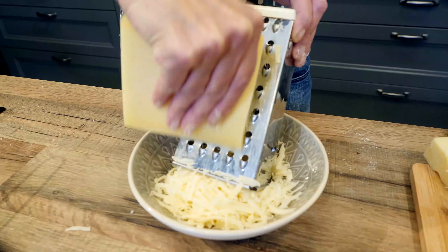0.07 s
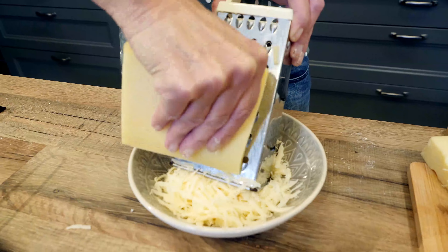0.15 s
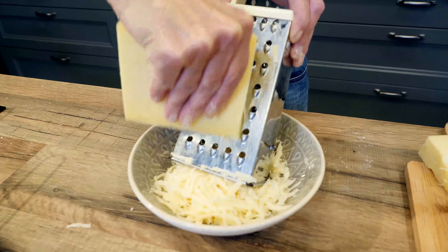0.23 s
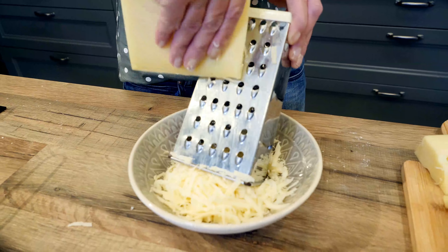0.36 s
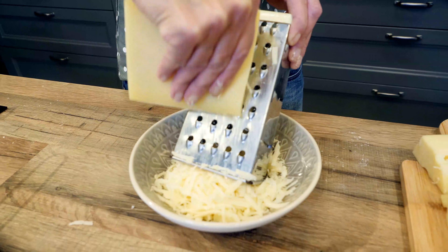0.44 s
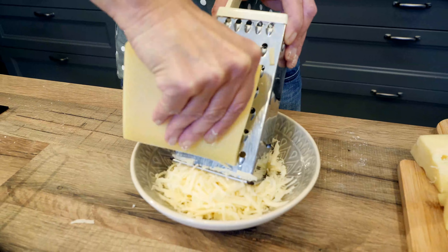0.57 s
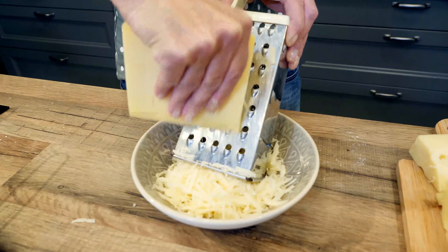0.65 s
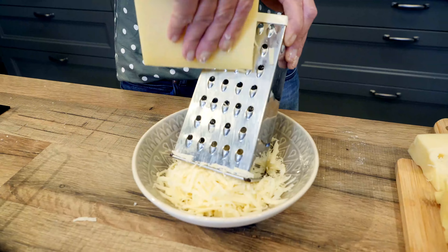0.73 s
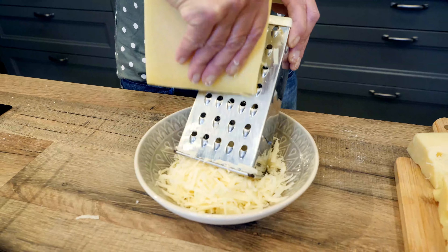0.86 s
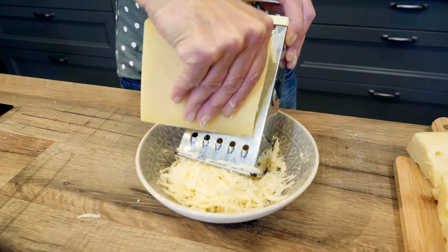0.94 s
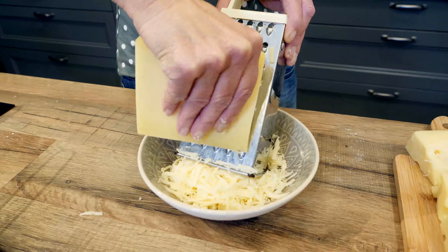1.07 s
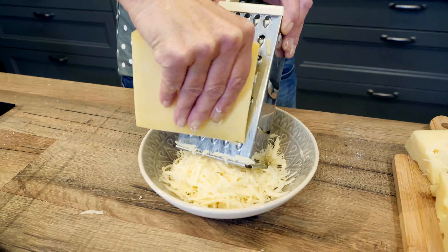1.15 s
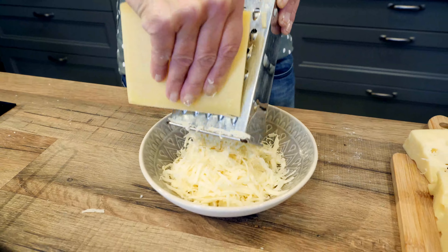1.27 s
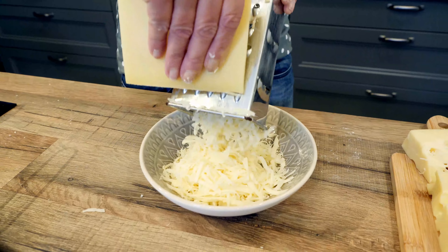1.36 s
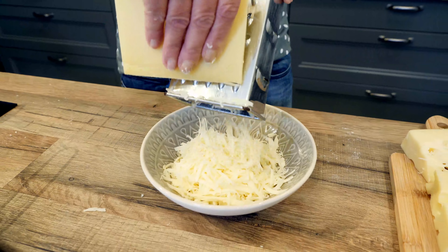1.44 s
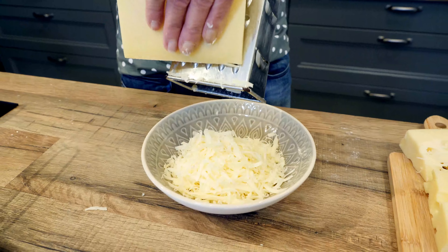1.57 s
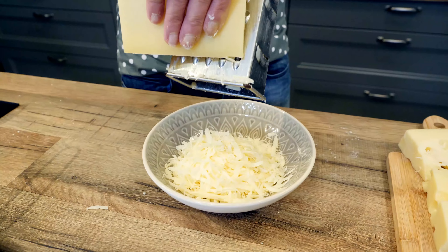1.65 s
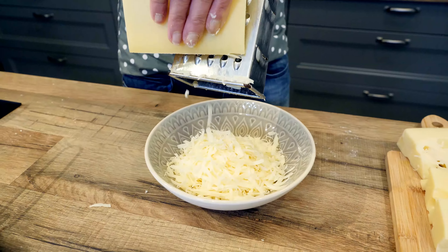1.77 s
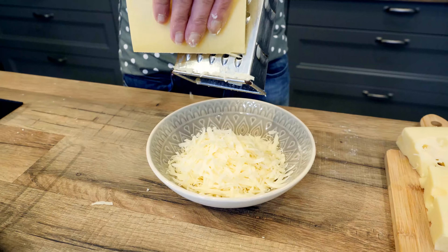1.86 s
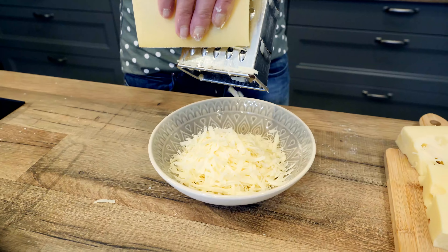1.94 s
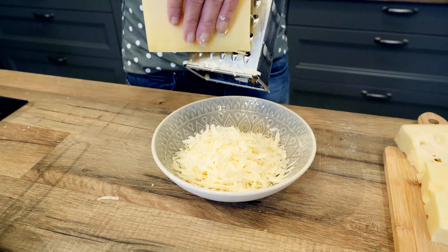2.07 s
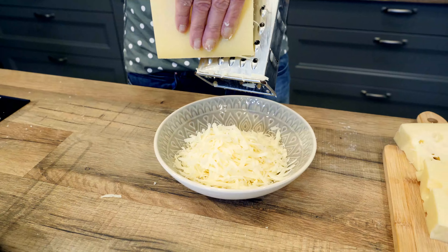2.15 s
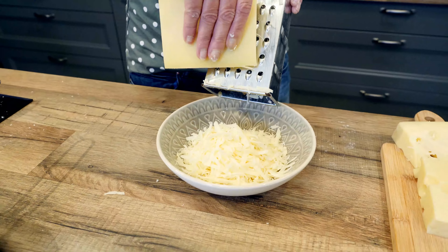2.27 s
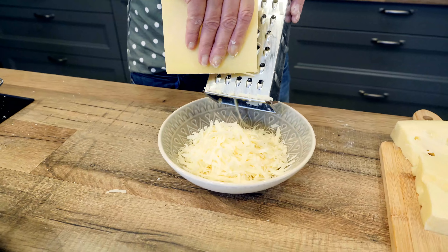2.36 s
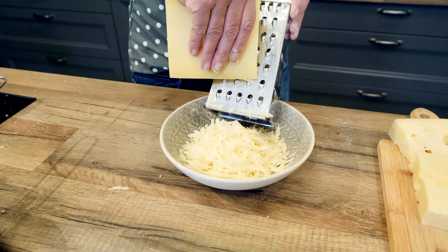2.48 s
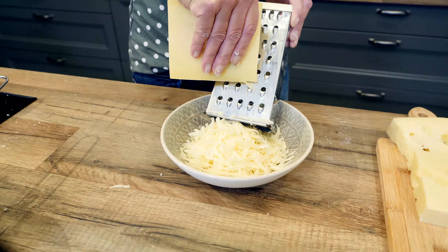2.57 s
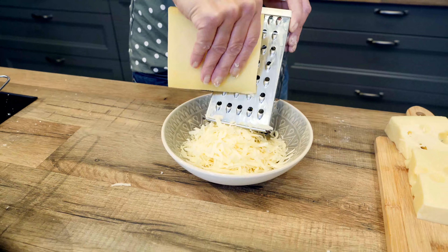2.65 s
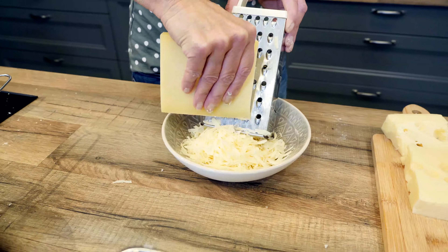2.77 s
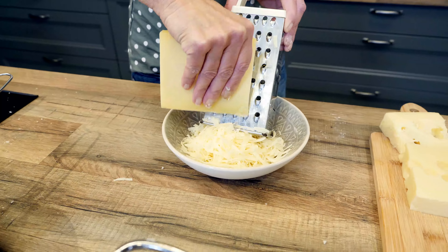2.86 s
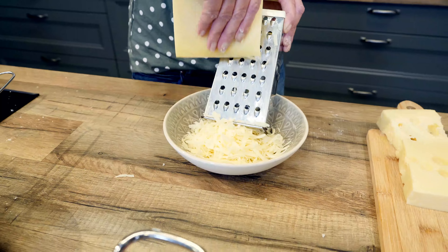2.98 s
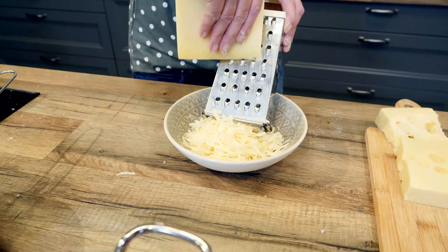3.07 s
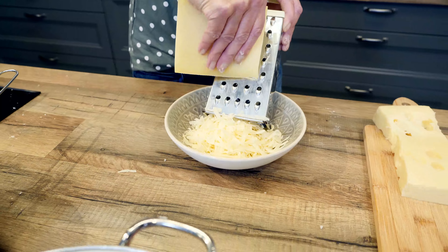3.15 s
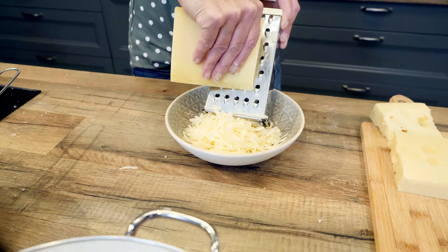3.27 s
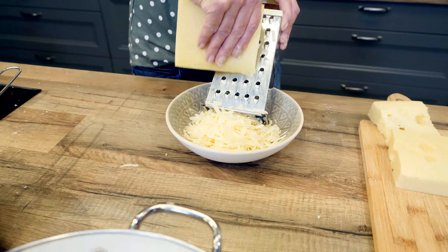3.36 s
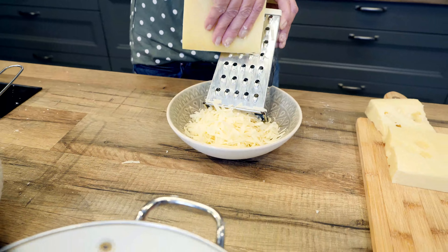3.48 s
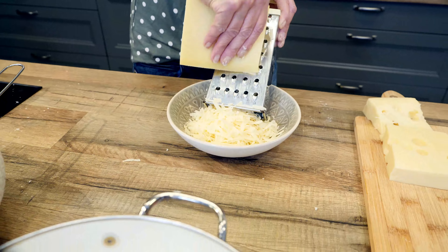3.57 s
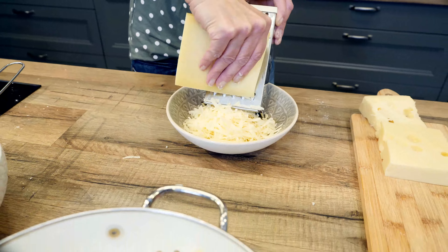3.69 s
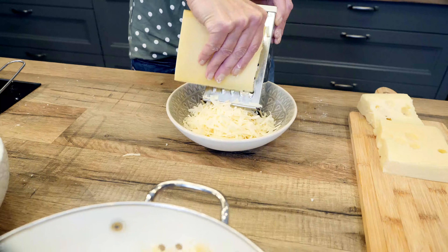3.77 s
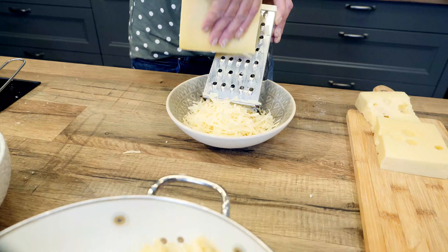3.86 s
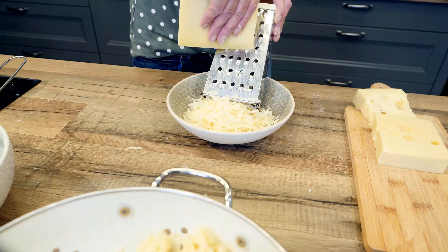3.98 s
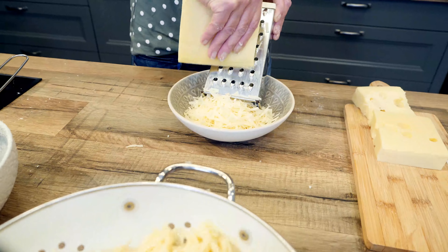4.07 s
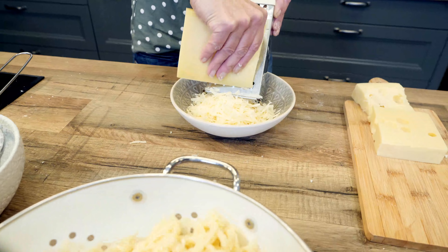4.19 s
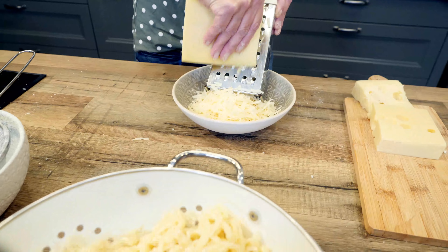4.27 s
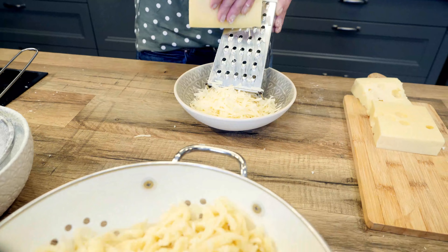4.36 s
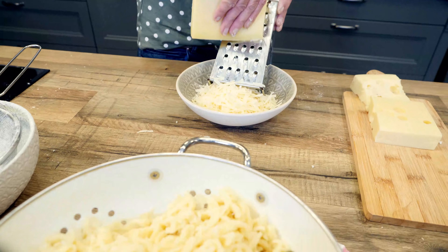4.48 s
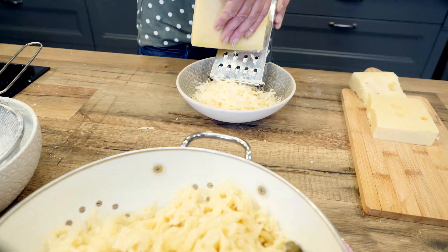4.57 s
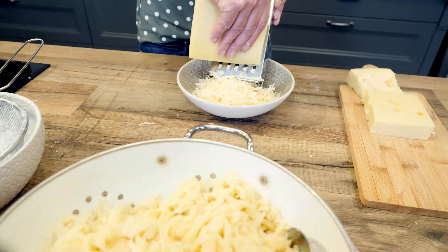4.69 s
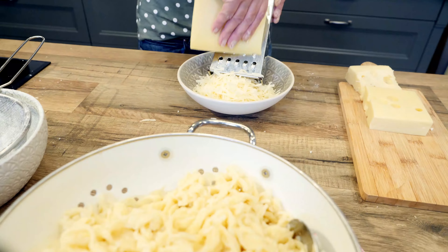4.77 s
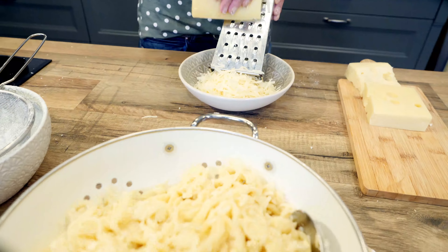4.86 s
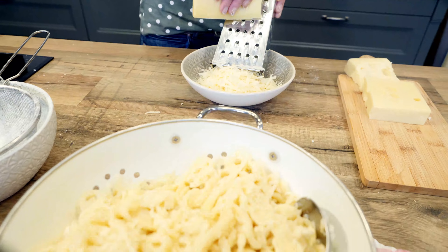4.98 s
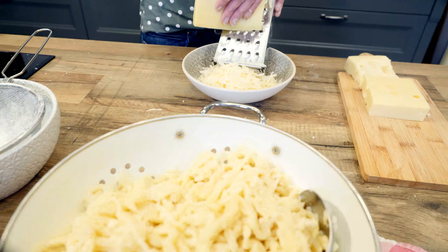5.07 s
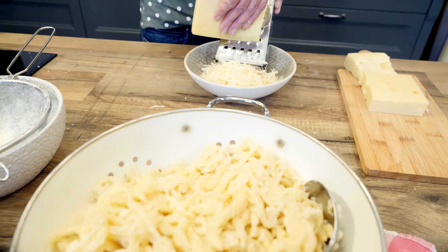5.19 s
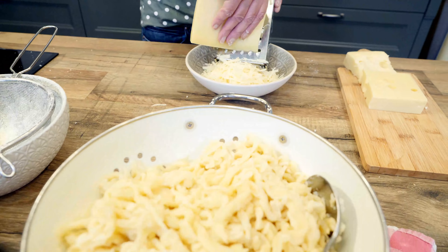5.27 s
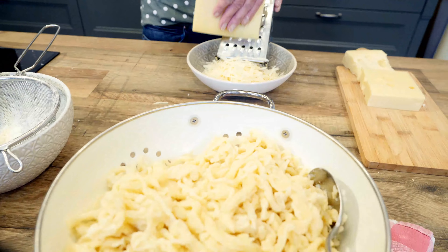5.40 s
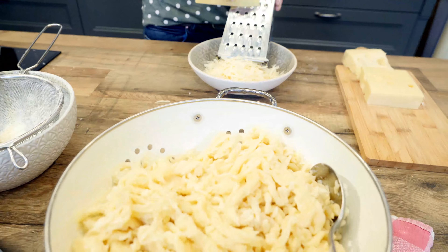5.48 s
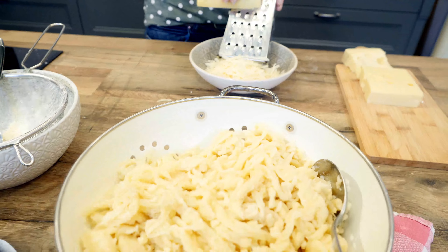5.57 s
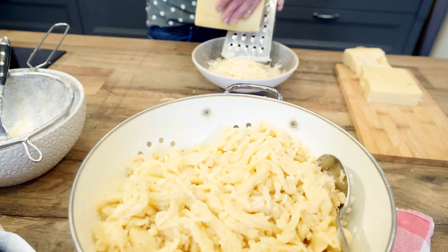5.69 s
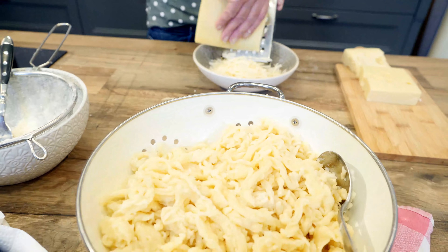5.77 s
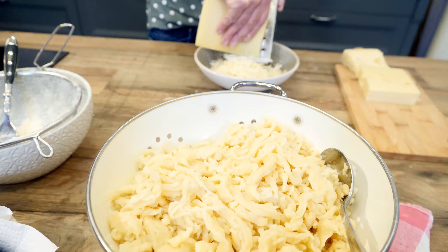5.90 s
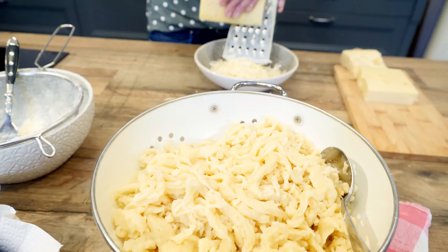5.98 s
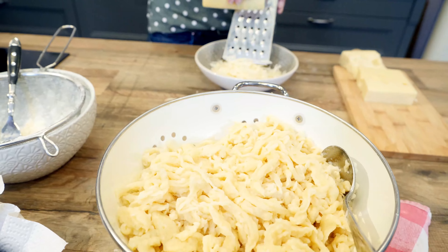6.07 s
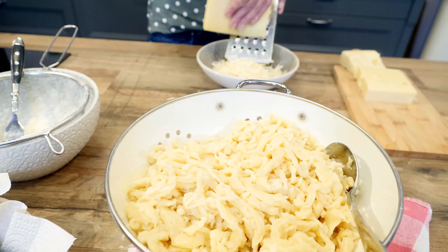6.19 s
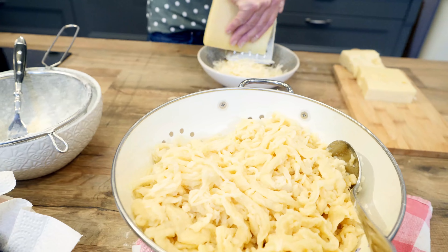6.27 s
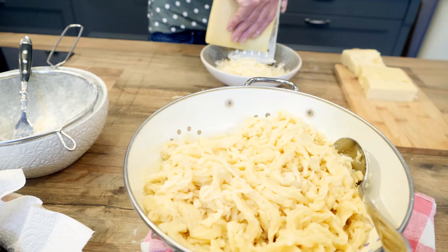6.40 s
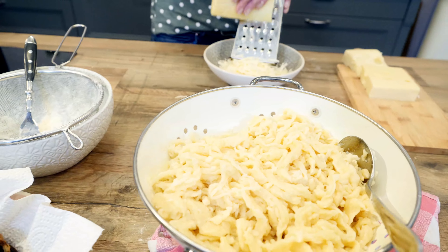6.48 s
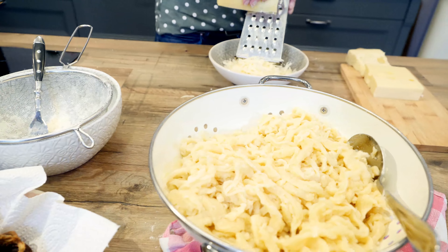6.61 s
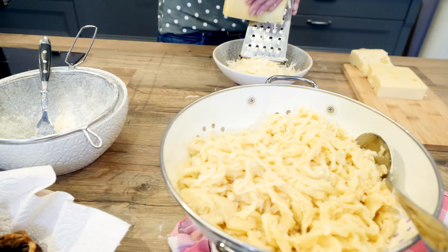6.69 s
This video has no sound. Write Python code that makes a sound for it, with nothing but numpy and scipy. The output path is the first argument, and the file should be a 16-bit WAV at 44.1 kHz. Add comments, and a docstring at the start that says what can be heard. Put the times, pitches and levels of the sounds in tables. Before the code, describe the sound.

Cheese rubbed up and down a steel grater in short rasping strokes with dull counter thuds, a pause, then one sharp metallic knock.

```python
"""A small kitchen: on a wooden counter, in a bowl, a steel box grater, heard close in equal channels.
About twice a second a block of cheese is drawn up and pressed down: random slips shaped by the steel's resonances.
Teeth catch as short bursts of slips, and downstrokes thud into the counter as dying sines with puffs of noise.
The grater is lifted, ticks in the air, and is set back with one sharp knock: filtered noise and ringing modes.
Reflections made from sparse random clicks, and a nearly steady hiss of filtered noise, lie behind."""
import sys
import numpy as np
from scipy import signal
from scipy.io import wavfile
from scipy.ndimage import uniform_filter1d

SR = 44100
rng = np.random.default_rng(int(sys.argv[2]) if len(sys.argv) > 2 else 0)


def unload_audio(sound):
    """Save the sound as a 16-bit wav file, at the path given as the first command line argument."""
    columns = np.transpose(np.atleast_2d(sound))
    # keep every value between -1 and 1, then stretch to whole-number steps
    steps = np.round(np.clip(columns, -1, 1) * 32767)
    wavfile.write(sys.argv[1], SR, steps.astype(np.int16))


N = 297234
TIME = np.arange(N) / SR  # s


def gain_of(db):
    """Decibels to amplitude."""
    return 10 ** (np.asarray(db) / 20)


def evened(x):
    """Scales to an rms of 1."""
    return x / np.sqrt(np.mean(x ** 2) + 1e-20)


def read(points, hz):
    """Reads a curve given as (Hz, value) rows on a log-frequency axis."""
    point_hz, value = np.transpose(points)
    return np.interp(np.log(hz + 1), np.log(point_hz + 1), value)


def add(mix, s, sound):
    """Lays a sound into the mix at s seconds."""
    part = mix[max(round(s * SR), 0):][:len(sound)]
    part += sound[:len(part)]


def colour(x, response, size=4096):
    """Causal, minimum-phase filter whose gain in dB is response(Hz)."""
    hz = abs(np.fft.fftfreq(size, 1 / SR))
    log_gain = np.log(gain_of(response(hz)))
    taps = np.fft.ifft(np.exp(np.conj(signal.hilbert(log_gain)))).real
    return signal.oaconvolve(x, taps[:size // 2])[:len(x)]


def noise_burst(t, decay_s, response):
    """White noise that dies away exponentially, then is coloured."""
    return colour(rng.standard_normal(len(t)) * np.exp(-t / decay_s), response)


def hump(hz, centre_hz, slope_db):
    """Gain in dB that falls on both sides of a centre, by slope_db an octave, for up to three octaves."""
    octaves = np.hypot(np.log2((hz + 1) / centre_hz), .3)  # rounded at the top
    return -slope_db * np.minimum(octaves, 3)


def peaks(hz, resonances):
    """Gain in dB of a few resonances."""
    return sum(db / (1 + (2 * (hz - f) / width) ** 2) for f, width, db in resonances)


def ring(modes, t):
    """A sum of dying sines that swell over the brief time of contact."""
    swell = np.sin(np.pi / 2 * np.minimum(t / .0004, 1)) ** 2
    total = 0
    for hz, db, t60 in modes:
        total = total + gain_of(db - 60 * t / max(t60, 1e-3)) * np.sin(2 * np.pi * hz * t)
    return swell * total


def slips(size, per_s, spread_db):
    """Tiny stick-slip jerks of uneven strength, at random times and of either sign."""
    strength = gain_of(spread_db * np.minimum(rng.exponential(1, size), 3))
    sign = rng.choice([-1., 1.], size)
    return strength * sign * (rng.random(size) < per_s / SR)


# colour of the hiss: pitch_hz, relative level_db per Hz
HISS_COLOUR = [(20, 1.5), (150, -5.5), (500, 0.5), (1200, -1.5), (1900, -4.5), (2500, -8), (4500, -9),
               (6000, -14), (8000, -13), (12000, -15.5), (16000, -21.5)]
# slow drift of the hiss: time_s, level_db against HISS_DB
HISS_DRIFT = [(.2, 0.5), (1.0, 0), (1.6, 1), (2.3, 1), (2.9, 2), (4.6, 0.5), (6.7, 0.5)]
HISS_DB = -44.5


def hiss():
    """Room air and microphone hiss: coloured noise whose level drifts slowly."""
    air = evened(colour(rng.standard_normal(N), lambda hz: read(HISS_COLOUR, hz)))
    return air * gain_of(HISS_DB + np.interp(TIME, *np.transpose(HISS_DRIFT)))


def rumble():
    """The counter trembles, as low noise, for as long as the grater stands on it."""
    standing = np.interp(TIME, [.95, 1.15, 2.52, 2.75], [1, 0, 0, 1])
    response = [(10, -16), (28, -2.5), (60, 1.5), (90, -6.0), (130, -2.5), (200, -13),
                (400, -19.5), (1500, -43.0)]  # Hz, dB
    tremble = colour(rng.standard_normal(N), lambda hz: read(response, hz))
    return gain_of(-43.0) * standing * evened(tremble)


# broad response of the rasped steel: pitch_hz, gain_db
RASP = [(30, -41), (90, -8), (200, 2), (450, 0), (700, -3.5), (1200, -6.5), (2000, -9), (2600, -16.5),
        (4500, -14), (7000, -13.5), (15000, -52)]
# resonances of the steel damped by hand and cheese: pitch_hz, width_hz, gain_db
DAMPED_STEEL = [(127, 114, 7), (267, 88, 4.5), (432, 185, 5.5), (580, 70, 1.5), (960, 510, 1.5),
                (1171, 66, 6), (1710, 36, 5), (1994, 320, 5)]


def grater(hz):
    """Response in dB of the hand-damped steel."""
    return read(RASP, hz) + peaks(hz, DAMPED_STEEL)


ATTACK_S, SAG_DB_PER_S, RELEASE_S = 0.024, 18, .055  # every stroke rises, slackens and dies away


def effort(strokes):
    """Strength of the rubbing over time: each stroke speeds up, slackens as it goes, and stops."""
    out, t = np.zeros(N), np.arange(SR) / SR
    for start, length, db, *_ in strokes:
        rise = np.minimum(t / ATTACK_S, 1)
        release = np.exp(-np.maximum(t - length, 0) / RELEASE_S)
        add(out, start, rise * gain_of(db - SAG_DB_PER_S * t) * release)
    return out


# the block drawn back up the grater: start_s, length_s, relative level_db
DRAWS = [(0.2, 0.23, -34), (0.614, 0.2, -37), (1.081, 0.55, -42), (2.581, 0.17, -30.5),
         (2.935, 0.08, -38.5), (3.366, 0.17, -41.5), (3.823, 0.21, -37.5), (4.256, 0.22, -37.5),
         (4.782, 0.23, -37.5), (5.405, 0.17, -36), (5.915, 0.14, -36.5), (6.449, 0.2, -38.5)]
# the block pressed down over the teeth: start_s, length_s, relative level_db, first-bite hardness_db
DOWNSTROKES = [(0.449, 0.083, -37.5, 0), (0.855, 0.11, -37.5, 1.5), (2.78, 0.053, -41.5, -2),
               (3.09, 0.076, -39, 1), (3.561, 0.12, -38.5, 2), (4.051, 0.16, -38.5, 0.5),
               (4.479, 0.15, -41.5, -2.5), (5.03, 0.23, -41.5, -5), (5.61, 0.25, -37.5, -3.5),
               (6.179, 0.11, -34, 0), (6.678, 0.1, -44.5, -2)]


def rubbing():
    """Dense slips under each stroke; each pitch band's loudness wavers at random, independently of the others."""
    scrape = np.zeros(N)
    for centre_hz in np.geomspace(250, 2000, num=6):
        slow_noise = uniform_filter1d(rng.standard_normal(N), size=900)
        waver = evened(uniform_filter1d(slow_noise, size=400))
        jerks = slips(N, per_s=1200, spread_db=3.5) * gain_of(4.5 * np.clip(waver, -2, 1.5))
        scrape += colour(jerks, lambda hz: (grater(hz) + hump(hz, 1210, slope_db=2.5)
                                            + hump(hz, centre_hz, slope_db=13)))
    return evened(scrape) * gain_of(-2.0) * effort(DRAWS + DOWNSTROKES)


LIGHT_DB = -2.5  # lighter catches, against the stroke
LIGHT_LOW_HZ, LIGHT_HIGH_HZ = 600, 2000  # range of their notes


def light_catches(count):
    """A few chance catches in each stroke, following its sag: rows of start_s, relative level_db, pitch_hz."""
    rows = []
    for start, length, db, *_ in DRAWS + DOWNSTROKES:
        into_s = length * (np.arange(count) + rng.random(count)) / count
        level_db = db + LIGHT_DB - SAG_DB_PER_S * into_s
        pitch_hz = LIGHT_LOW_HZ * (LIGHT_HIGH_HZ / LIGHT_LOW_HZ) ** rng.random(count)
        rows += zip(start + into_s, level_db, pitch_hz)
    return rows


# teeth catching hard in the cheese: start_s, relative level_db, pitch_hz
CATCHES = [(0.221, -29, 470), (0.234, -29, 960), (0.263, -37, 1920), (0.343, -30.5, 1110),
           (0.352, -24, 330), (0.495, -29.5, 1680), (0.617, -28, 903), (0.68, -32, 1300),
           (0.709, -22.5, 480), (0.726, -23.5, 1130), (0.729, -21, 300), (0.905, -32.5, 1200),
           (1.096, -33.5, 800), (2.697, -32, 326), (2.714, -29.5, 980), (2.96, -26.5, 516),
           (2.99, -33, 1070), (3.831, -31.5, 1500), (3.839, -28, 740), (3.866, -31, 760), (3.985, -29, 654),
           (4.17, -29, 1800), (4.174, -28.5, 515), (4.325, -34, 1280), (4.89, -34, 600), (4.996, -31, 885),
           (5.418, -35, 636), (5.747, -33, 500), (6.082, -32, 510), (6.192, -27.5, 830), (6.23, -27.5, 930),
           (6.305, -35.5, 1760), (6.643, -29.5, 820)]


def catches():
    """Teeth bite the cheese: a firm jerk, then slips that thin away; each catch has its own note."""
    out, t = np.zeros(N), np.arange(SR // 5) / SR
    shape = (1 - np.exp(-t / 0.0021)) * (np.exp(-t / 0.0058) + .12 * np.exp(-t / 0.036))
    for s, db, centre_hz in CATCHES + light_catches(count=2):
        jerks = shape * slips(len(t), per_s=2000, spread_db=3)
        jerks[0] += 0.39 * np.linalg.norm(jerks)  # the firm first jerk
        note = [(centre_hz, 0.33 * centre_hz, 5)]
        tear = colour(jerks, lambda hz: grater(hz) + hump(hz, centre_hz, slope_db=8.0) + peaks(hz, note))
        add(out, s, gain_of(db - 11.5) * evened(tear))
    return out


SOFTEN_DB_PER_S = 54.5  # pushes soften as the block travels down


def hardness(s):
    """Level in dB of the counter's upper modes over its lowest, from the nearest downstroke and time since it."""
    start, _, _, bite_db = min(DOWNSTROKES, key=lambda row: abs(row[0] - s))
    return bite_db - SOFTEN_DB_PER_S * (s - start)


# heavy pushes that reach the counter: start_s, relative level_db
PUSHES = [(0.453, -23), (0.494, -29), (0.536, -22), (0.857, -31), (0.907, -25), (0.948, -22.5),
          (2.783, -25), (3.092, -29.5), (3.133, -23), (3.248, -27.5), (3.567, -23), (3.627, -26.5),
          (3.687, -29), (4.056, -24.5), (4.105, -23.5), (4.168, -22), (4.484, -22.5), (4.548, -29),
          (4.631, -27), (4.926, -27), (5.088, -25), (5.2, -24.5), (5.289, -28), (5.616, -31.5),
          (5.685, -28), (5.791, -24.5), (6.19, -23), (6.228, -27), (6.684, -34)]
# modes of the counter under the bowl, lowest first: pitch_hz, relative level_db, t60_s
COUNTER = [(50.5, -0.5, 0.31), (129, -1, 0.22), (173, -10.5, 0.19), (227.4, -5.5, 0.077), (285.5, -9, 0.1),
           (391.7, -7, 0.13)]
# a hard catch also jolts the counter's upper modes, the more so the deeper its note
JOLT_DB, JOLT_DB_PER_OCTAVE, JOLT_HZ = 5, -14.5, 300
JOLT_DECAY_S, THUMP_HZ = .016, 215  # the dull thump of that jolt


def pushes():
    """Pushes swing the counter; harder ones wake its upper modes and a dull puff. Hard catches jolt it too."""
    out, t = np.zeros(N), np.arange(SR // 2) / SR
    lowest, upper = ring(COUNTER[:1], t), ring(COUNTER[1:], t)
    puff_response = [(30, -5.0), (130, 4.0), (400, -4.0), (800, -23), (3000, -37.0)]  # Hz, dB
    for s, db in PUSHES:
        puff = noise_burst(t, 0.02, lambda hz: read(puff_response, hz))
        hard = gain_of(hardness(s))
        swing = lowest + hard * (upper + gain_of(-20.5) * evened(puff))
        balance = np.sqrt(2 / (1 + hard ** 2))  # a harder push is brighter rather than much louder
        add(out, s, gain_of(db) * swing * balance)
    for s, db, centre_hz in CATCHES:
        thump = noise_burst(t, JOLT_DECAY_S, lambda hz: hump(hz, THUMP_HZ, slope_db=16))
        jolt = gain_of(-5) * upper + gain_of(-19) * evened(thump)
        depth_db = JOLT_DB_PER_OCTAVE * np.log2(centre_hz / JOLT_HZ)
        add(out, s, gain_of(db + JOLT_DB + depth_db) * jolt)
    return out


# resonances of the steel lifted free of the bowl: pitch_hz, width_hz, gain_db
FREE_STEEL = [(430, 42, 9), (760, 220, 18), (1040, 46, 10), (1800, 90, 14)]
# the last slide over the free steel: time_s, level_db
LAST_SLIDE = [(1.0, -62), (1.1, -45.5), (1.2, -41), (1.32, -48.5), (1.6, -75)]


def lifting():
    """Off the bowl, the steel sings more narrowly under the last of the stroke."""
    jerks = slips(N, per_s=2700, spread_db=1.5)
    slide = colour(jerks, lambda hz: read(RASP, hz) + peaks(hz, FREE_STEEL))
    return evened(slide) * gain_of(np.interp(TIME, *np.transpose(LAST_SLIDE)))


# small sharp ticks: start_s, relative level_db, pitch_hz, room share_db
TICKS = [(1.896, -29.5, 4000, -13), (1.9004, -30.5, 6050, -1.5), (2.782, -31.5, 2500, -14),
         (2.8395, -43, 6500, -9), (3.913, -33, 15000, -3), (4.0017, -39, 11500, -13),
         (4.172, -33.5, 2500, -19), (4.237, -35.5, 4500, -6), (4.2411, -32.5, 9000, -8),
         (4.255, -35, 13500, -8), (5.103, -44, 6600, -21), (5.202, -41, 6200, -9),
         (5.444, -41.5, 4500, 1.5), (6.716, -45.5, 6700, -11)]
# broad response shared by the ticks: pitch_hz, gain_db
TICK_COLOUR = [(100, -14), (700, 5), (2000, 0.5), (7000, -6.5), (12000, -5), (16000, -14)]


def ticks():
    """Bright snaps with a brief splinter of noise; returns the direct sound and the part that fills the room."""
    direct, sent, t = np.zeros(N), np.zeros(N), np.arange(SR // 30) / SR
    for s, db, centre_hz, room_db in TICKS:
        tone = lambda hz: read(TICK_COLOUR, hz) + hump(hz, centre_hz, slope_db=6.0)
        snap = evened(colour(1. * (t == 0), tone))
        splinter = evened(noise_burst(t, .0012, tone))
        add(direct, s, gain_of(db - 14) * snap + gain_of(db - 7.0) * splinter)
        add(sent, s + .003, gain_of(db + room_db) * snap)
    return direct, sent


# touches as the grater is set down in the bowl: start_s, relative level_db
KNOCKS = [(2.4836, 3.5), (2.4853, 7), (2.4867, 2.5)]
# noise of each touch: pitch_hz, gain_db
CRACK = [(50, -26), (220, 3), (450, 4), (750, -10), (1600, 11.5), (2900, -2.5), (4700, 3.5), (6800, -18),
         (10000, -13.5), (16000, -52)]
# modes of the loudest clack: pitch_hz, relative level_db, t60_s
CLACK = [(289, -8.5, 0.066), (1620, -2, 0.018), (2460, -29, 0.02), (4160, 2.5, 0.025), (4970, -2.5, 0.015),
         (5880, -15, 0.033), (6400, -18, 0.039)]
# modes of grater and bowl when struck: pitch_hz, relative level_db, t60_s
STEEL_RING = [(220, -13, 0.7), (403, -14, 0.6), (918, -9, 0.3), (1214, -12, 0.35), (1346, -12, 0.25),
              (1591, -6, 0.33), (1830, -20, 0.4), (1999, -11, 0.33), (2260, -18, 0.42), (2438, -21, 0.5),
              (2478, -15, 0.35), (2692, -21, 0.5), (3026, -25, 0.45), (3302, -20, 0.45), (3408, -22, 0.5),
              (3587, -22, 0.42), (4138, -11, 0.25), (4171, -14, 0.3), (4725, -13, 0.35), (4764, -11, 0.38),
              (5881, -33, 0.22), (6401, -29, 0.4)]
# crowded modes of bowl and counter, as noise: pitch_hz, gain_db
SHUDDER = [(60, -18), (200, -3.5), (450, -1), (700, -12), (1100, -3.5), (2000, -15), (3400, -12.5),
           (6000, -41)]


def knock():
    """The steel rim meets the bowl in a quick chatter; returns that contact and the ring from its loudest touch."""
    contact, after, t = np.zeros(N), np.zeros(N), np.arange(SR) / SR
    for s, db in KNOCKS:
        crack = noise_burst(t, 0.0019, lambda hz: read(CRACK, hz))
        add(contact, s, gain_of(db - 45.5) * evened(crack))
    loudest_s = KNOCKS[1][0]
    add(contact, loudest_s, gain_of(-7.5) * ring(CLACK, t))
    # bowl and counter shudder in many crowded modes, dying together
    shudder = noise_burst(t, 0.092, lambda hz: read(SHUDDER, hz))
    add(after, loudest_s, gain_of(-19) * ring(STEEL_RING, t) + gain_of(-37.5) * evened(shudder))
    return contact, after


# how long the kitchen's reflections last: pitch_hz, t60_s
KITCHEN_DECAY = [(60, 0.33), (250, 0.67), (1000, 0.51), (4000, 0.35), (9000, 0.38), (16000, 0.24)]


def kitchen(x):
    """Dense reflections that start after a few milliseconds, each band dying at its own speed."""
    taps = rng.choice([-1., 1.], SR) * (rng.random(SR) < 1 / 8) * (TIME[:SR] > .004)
    hz, t, bands = signal.stft(taps, SR, nperseg=256)
    decay = gain_of(-60 * t / read(KITCHEN_DECAY, hz)[:, None])
    tail = signal.istft(bands * decay, SR, nperseg=256)[1]
    return signal.fftconvolve(x, tail / np.linalg.norm(tail))[:N]


def scene():
    """All sources with their share of the room, the same in both channels."""
    rasp, thud = rubbing() + catches() + lifting(), pushes()
    tick, tick_sent = ticks()
    contact, after = knock()
    to_room = gain_of(-9.0) * rasp + gain_of(-19) * thud
    to_room += gain_of(-5.5) * tick_sent + gain_of(-10.5) * contact
    mono = rasp + thud + tick + contact + after + kitchen(to_room) + rumble() + hiss()
    return np.array([mono, mono])


START_S, EDGE_HZ = .2205, 15900  # silence before the start; upper edge of the band


def record(dry):
    """The sound starts abruptly, and a linear-phase low-pass limits the band."""
    live = dry * (TIME >= START_S)
    low_pass = signal.firwin(511, EDGE_HZ, window=("kaiser", 9), fs=SR)
    return signal.oaconvolve(live, low_pass[None], "same")


dry = scene()
out = record(dry)
unload_audio(out)
```